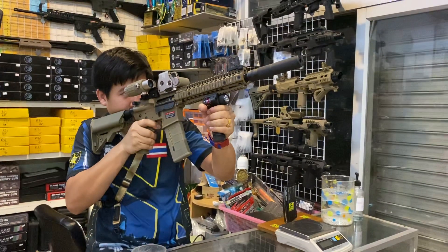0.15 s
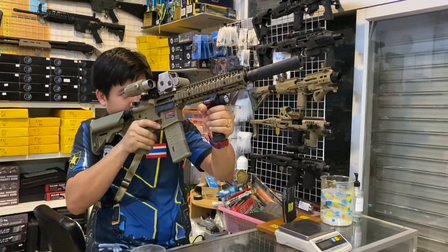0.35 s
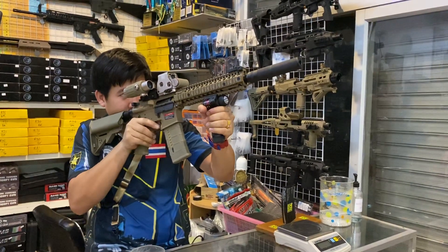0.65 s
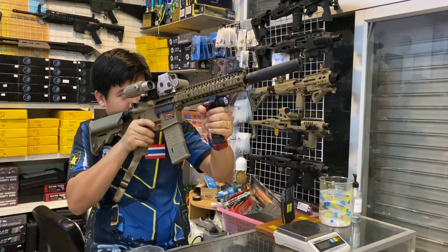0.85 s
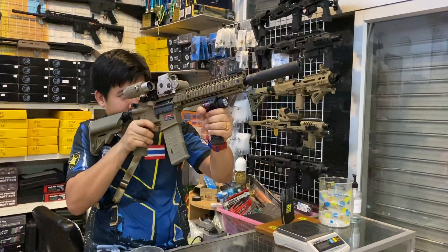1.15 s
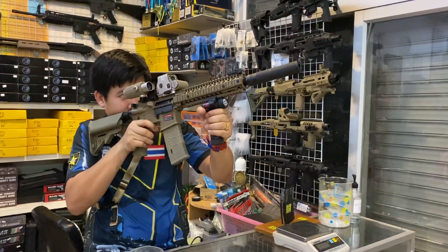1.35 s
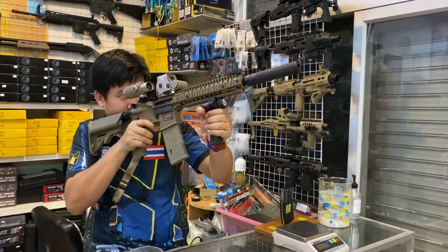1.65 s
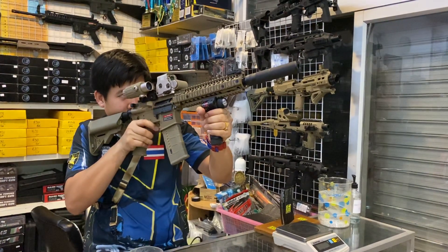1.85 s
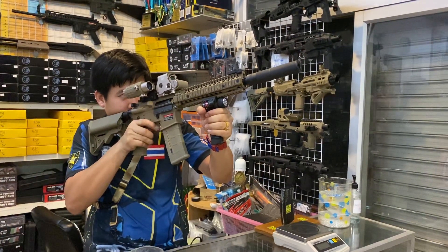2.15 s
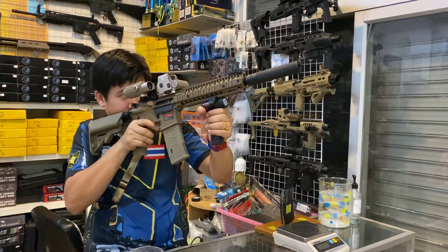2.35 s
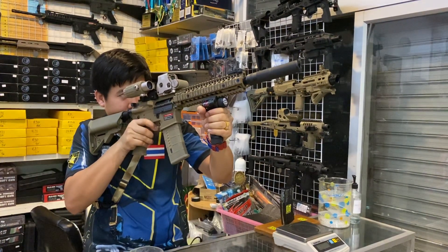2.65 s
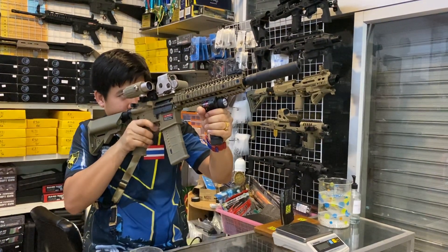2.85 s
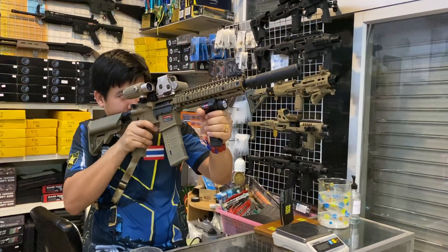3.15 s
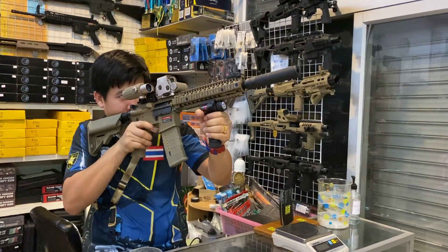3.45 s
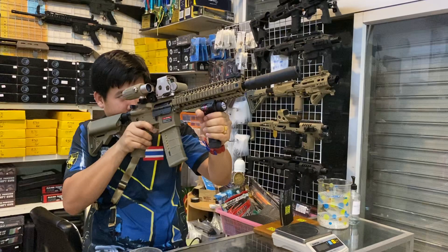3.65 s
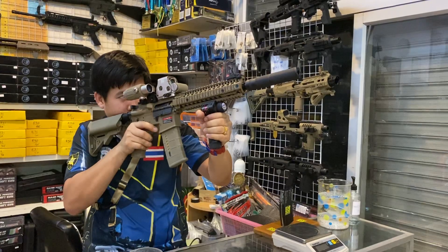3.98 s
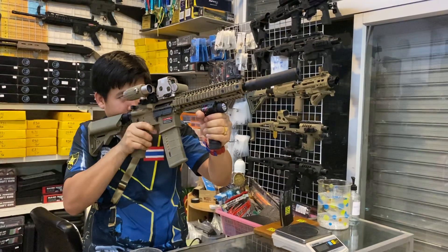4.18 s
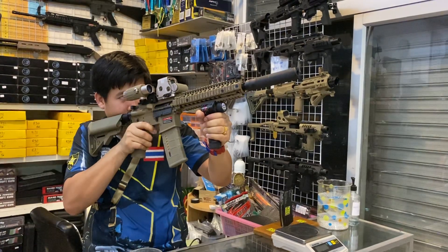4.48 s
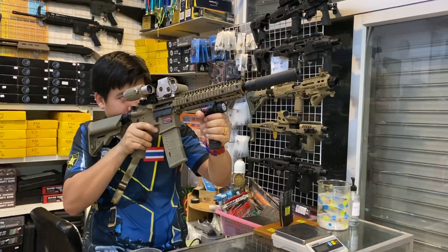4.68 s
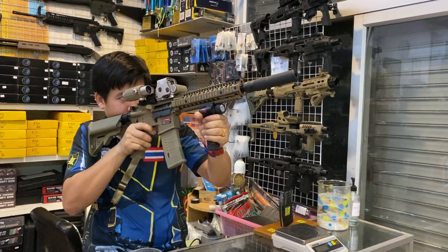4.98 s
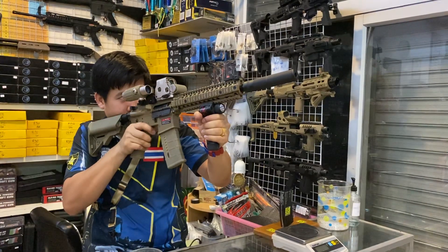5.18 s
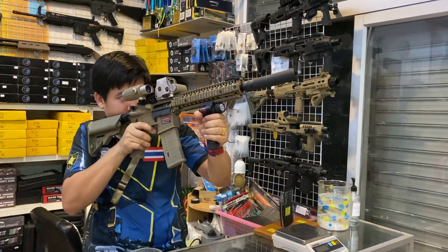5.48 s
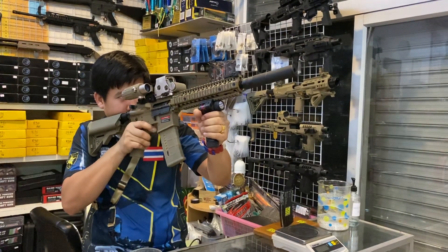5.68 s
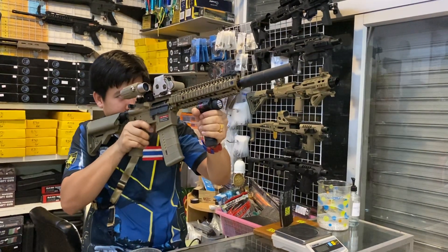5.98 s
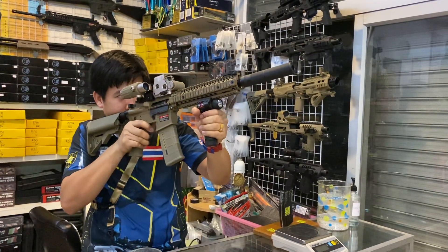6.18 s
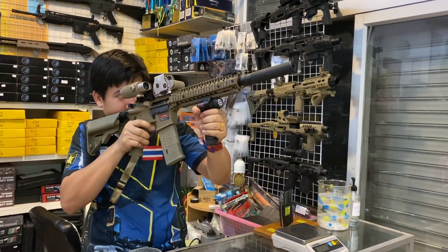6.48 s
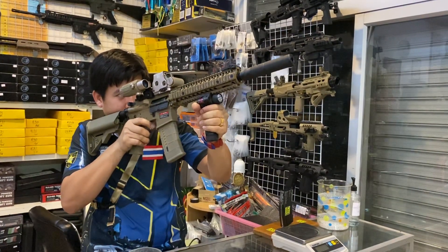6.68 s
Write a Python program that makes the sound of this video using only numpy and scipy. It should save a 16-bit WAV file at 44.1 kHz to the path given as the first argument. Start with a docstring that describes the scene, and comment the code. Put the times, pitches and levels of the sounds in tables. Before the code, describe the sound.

An electric airsoft rifle is fired in a small, cluttered shop, heard close in stereo. From 0 to 0.3 s a full-auto burst is already running, about twenty sharp dry cracks per second over gritty gear whine, then the motor coasts down. Between 0.5 and 0.9 s come faint cloth rustle and tiny clicks. From 0.92 to 3.6 s fifteen single shots follow at roughly five per second, each a brief motor wind-up, hard piston snap, hollow low air puff and, 20 ms later, a pellet's bright smack on a target. A small click falls at 3.95 s. Full-auto bursts run at 4.2-4.6, 5.0-5.5 and 5.95-6.45 s, the first shot of each strongest and the gears quieter in the later ones. Faint clicks near 6.65 s precede a final short wind-up at 6.8 s, cut before its shot. Short dense echoes, soft ventilation and low hum remain.

```python
"""Airsoft rifle in a small shop

The end of a full-auto burst, a run of quick single shots, three more bursts and a last wind-up.
Motor and gears wind the spring with a gritty whine, the piston slams home and air puffs from the muzzle;
some 20 ms later each pellet smacks a target in filtered noise and rings it. Struck parts are damped modes.
Soft clicks and rustle come from the hands. Dense echoes, faint ventilation and mains hum fill the shop."""
import sys
import numpy as np
from scipy import signal
from scipy.fft import rfft, irfft, next_fast_len
from scipy.io import wavfile
from scipy.ndimage import uniform_filter1d

SR = 44100
rng = np.random.default_rng(int(sys.argv[2]) if len(sys.argv) > 2 else 0)


def log_audio(samples):
    """Write samples as a 16-bit WAV file to the path given in sys.argv[1]."""
    # one column per channel
    frames = np.atleast_2d(samples).T
    # limit to full scale, then quantise
    limited = np.clip(frames, -1, 1)
    pcm = np.round(limited * 32767).astype(np.int16)
    wavfile.write(sys.argv[1], SR, pcm)


N = 301203
TIME = np.arange(N) / SR


def amp(db):
    """Turns decibels into a linear gain."""
    return 10 ** (np.asarray(db) / 20)


def unit(x):
    """Scales to rms 1."""
    return x / np.sqrt(np.mean(x ** 2) + 1e-20)


def read(points, hz):
    """Joins the points of a curve on a log-frequency axis."""
    f, value = np.transpose(points)
    return np.interp(np.log(hz + 1), np.log(f + 1), value)


def shape(x, gain):
    """Filters by a gain given as a function of Hz."""
    size = next_fast_len(x.shape[-1] + 4096)
    spectrum = rfft(x, size) * gain(np.fft.rfftfreq(size, 1 / SR))
    return irfft(spectrum, size)[..., :x.shape[-1]]


def noise(spectrum, channels=1):
    """Noise of rms 1 with the given spectrum."""
    white = rng.standard_normal((channels, N))
    return unit(shape(white, lambda hz: amp(read(spectrum, hz))))


def wander(smooth_samples):
    """Slow random curve of rms 1."""
    return unit(uniform_filter1d(rng.standard_normal(N), size=smooth_samples))


def blows(times, sizes):
    """One impulse for each time that falls inside the scene."""
    at = np.round(np.asarray(times) * SR).astype(int)
    return np.bincount(np.maximum(at, 0), sizes * (at >= 0), 2 * N)[:N]


def through(x, response):
    """Convolves and keeps the length of the scene."""
    return signal.fftconvolve(np.atleast_2d(x), np.atleast_2d(response), axes=1)[:, :N]


def ring(modes):
    """Damped modes answering one blow."""
    t = TIME[:SR // 3]
    return sum(amp(db - 60 * t / t60) * np.cos(2 * np.pi * hz * t) for hz, db, t60 in modes)


def spread(mid, side, apart):
    """Makes left and right from a shared part and a part of opposite sign."""
    return np.array([mid + apart * side, mid - apart * side])


def burst(hits, spectrum, decay_s, apart=0.92):
    """Each hit frees a puff of noise that dies quickly and differs between the channels."""
    mid, side = noise(spectrum, channels=2)
    envelope = through(hits, np.exp(-TIME[:SR // 8] / decay_s))
    return envelope * spread(mid, side, apart)


# spectrum of the ventilation: (frequency [Hz], relative level [dB])
VENTILATION = [(15, -30), (25, -15), (45, -9), (66, -10), (93, -12.5), (191, -13.5), (354, -28.5),
               (2240, -38), (5880, -38), (8100, -58), (8780, -45), (15000, -69)]


def background():
    """Faint ventilation as shaped noise, partly shared by the channels, and a steady mains hum."""
    air = noise(VENTILATION, channels=3)
    hum = np.sin(2 * np.pi * 50 * TIME)
    return amp(-64.5) * (air[2] + .5 * air[:2]) + amp(-67.5) * hum


SETTLE = .13  # share of the motor's slowness that is left after each cycle
FIRST_SLAM_DB, FIRST_PUSH_DB = 2.5, 3.0  # the first shot of a burst is stronger by this much
PELLET_FADE_DB = -.5  # per shot, as the aim wanders in a burst
SLAM_SCATTER_DB, PELLET_SCATTER_DB = 0.67, 1.5  # chance from shot to shot in a burst


def full_auto(first, last, cycle_s, lag_s, slam_db, push_db, first_pellet_db, pellet_db):
    """Shots of one burst: the cycle settles to a steady rate, and the last shot has its own time."""
    k = np.arange(round((last - first) / cycle_s) + 1)
    steady = first + k * cycle_s + lag_s * (1 - SETTLE ** k)
    s = np.append(steady[:-1], last)
    chance = rng.standard_normal((len(k), 2))
    slam = slam_db + FIRST_SLAM_DB * (k == 0) + SLAM_SCATTER_DB * chance[:, 0]
    push = push_db + FIRST_PUSH_DB * (k == 0)
    later_pellets = pellet_db + PELLET_FADE_DB * k + PELLET_SCATTER_DB * chance[:, 1]
    pellet = np.where(k == 0, first_pellet_db, later_pellets)
    return np.transpose([s, slam, push, pellet])


WIND_UP_S = .057  # from the trigger to a single shot
SINGLE_PUSH_DB = 4  # muzzle push of a single shot
# single shots, one trigger pull each; the last shot falls after the end, so only its wind-up is heard:
# (time [s], piston slam [dB], pellet impact [dB], gearbox [dB]), all levels relative
SINGLE_SHOTS = [(.9195, -13.5, -29.5, 2.5), (1.1441, -11.5, -26, -2), (1.362, -16.5, -30, 0),
                (1.5539, -13.5, -26.5, 0), (1.745, -16, -23.5, -0.5), (1.929, -13.5, -28, -.5),
                (2.1176, -14.5, -27, 0), (2.299, -17.5, -24.5, 1), (2.4889, -14.5, -27, 0.5),
                (2.6758, -13, -33, 0), (2.8611, -16.5, -24, 0), (3.0551, -15, -22.5, 1),
                (3.2353, -18, -18.5, 0.5), (3.4257, -17.5, -17.5, 0), (3.5974, -15, -20, -1.5),
                (6.842, -24, -25, -5.5)]
# full-auto bursts, the first already running at the start: (first shot [s], last shot [s], cycle [s],
# time lost gathering speed [s], wind-up [s], piston slam [dB], muzzle push [dB], first pellet [dB],
# later pellets [dB], gearbox [dB]), all levels relative
AUTO_BURSTS = [(-.0393, 0.291, 0.047, 0, 0.055, -17, 0.5, -25, -30.5, -1.5),
               (4.2311, 4.6238, 0.048, .0077, .059, -16.5, 1, -17.5, -23.5, -0.5),
               (5.032, 5.536, .04869, .0107, .046, -18.5, -1.1, -16, -23.5, -4),
               (5.9538, 6.453, .04912, .0064, 0.066, -18.5, -1.5, -25.5, -21.5, -6.5)]


def firing():
    """All shots (s, slam dB, push dB, pellet dB) and trigger pulls (s, last shot s, gearbox dB), in order."""
    shots = [(s, slam, SINGLE_PUSH_DB, pellet) for s, slam, pellet, _ in SINGLE_SHOTS]
    pulls = [(s - WIND_UP_S, s, gears) for s, _, _, gears in SINGLE_SHOTS]
    for first, last, cycle_s, lag_s, wind_up_s, *levels, gears in AUTO_BURSTS:
        shots += map(tuple, full_auto(first, last, cycle_s, lag_s, *levels))
        pulls.append((first - wind_up_s, last, gears))
    return np.array(sorted(shots)), np.array(sorted(pulls))


SAG, TENSION_S = .17, .016  # share of speed lost as the spring tightens, and how long before the shot
# shots on which the motor labours hardest against the spring: (time [s], further share of speed lost [0-1])
HARD_PULLS = [(.9195, .35), (5.9536, .34)]


def motor(shots, pulls, spin_up_s=0.034, overrun_s=0.0052, coast_s=0.058, start_slow=.48,
          sing_s=0.031, sing_width_s=0.018):
    """Level, speed and load: the motor spins up, labours against the spring and fades after the last shot."""
    shot_s = shots[:, 0]
    coming = np.append(shot_s, 2 * TIME[-1])[np.searchsorted(shot_s, TIME)]
    tension = np.exp((TIME - coming) / TENSION_S)  # the spring is tightest just before each shot
    sag = SAG + sum(lost * (abs(coming - s) < spin_up_s) for s, lost in HARD_PULLS)
    pull = np.maximum(np.searchsorted(pulls[:, 0], TIME) - 1, 0)
    start, last, db = pulls[pull].T
    age = np.maximum(TIME - start, 0)
    slow = np.exp(-age / spin_up_s)
    coast = np.exp(-np.maximum(TIME - last - overrun_s, 0) / coast_s)
    level = amp(db) * (1 - 0.95 * slow) * coast
    speed = (1 - start_slow * slow) * (1 - sag * tension)
    straining = np.exp(-((age - sing_s) / sing_width_s) ** 2)  # the teeth sing loudest gathering speed
    return level, speed, straining


# spectrum of the gears and the trigger: (frequency [Hz], relative level [dB])
GEAR_SPECTRUM = [(100, -29.5), (300, -16.5), (650, -6.5), (1200, -2), (2500, 1.5), (5000, -1.5), (8500, 3),
                 (13000, -3.5), (16000, -22.5)]
# whine of the meshing teeth, one entry for each multiple of the mesh rate: (relative level [dB])
WHINE_HARMONICS = [-39, -39, -38, -43.5, -41]
# the housing jolted as the motor starts: (frequency [Hz], relative level [dB], t60 [s])
START_JOLT = [(764, -40, 0.082), (1790, -38.5, 0.11), (2950, -51, .05)]
# resonances of the gearbox housing: (frequency [Hz], width [Hz], level over the direct sound [dB])
HOUSING_MODES = [(764, 390, 7), (1840, 210, 6), (2460, 160, 0), (2954, 91, 1), (3630, 82, -9),
                 (4940, 310, 3)]


def gearbox(shots, pulls, mesh_hz=1160):
    """Trigger click, motor kick, and teeth that whine, rasp and clatter through the housing's resonances."""
    level, speed, straining = motor(shots, pulls)
    pull_s, _, pull_db = pulls.T
    trigger = amp(-43.0) * burst(blows(pull_s, 0.89), GEAR_SPECTRUM, decay_s=0.0014)
    kick = through(blows(pull_s + 0.0021, amp(pull_db)), ring(START_JOLT))

    wavering_hz = mesh_hz * speed * (1 + .028 * wander(120))
    mesh = 2 * np.pi * np.cumsum(wavering_hz) / SR
    whine = sum(amp(db) * np.sin(k * mesh) for k, db in enumerate(WHINE_HARMONICS, 1))

    grit = amp(2.3 * wander(40))
    rasp_envelope = unit(grit * (1 + .5 * np.cos(mesh)))  # the rasp pulses with each tooth
    mid, side = amp(-29.5) * noise(GEAR_SPECTRUM, channels=2) * rasp_envelope
    rasp = spread(mid, side, .5)

    ticks = rng.standard_normal(N) * (rng.random(N) < 400 / SR)  # about 400 a second
    clatter = amp(-29) * burst(ticks, GEAR_SPECTRUM, decay_s=.0008)

    drive = (rasp + clatter + whine * (.08 + straining)) * level + trigger

    def housing(hz):
        return 1 + sum(amp(db) / (1 + 2j * (hz - f) / width) for f, width, db in HOUSING_MODES)
    return kick + shape(drive, housing)


# soft low bumps during the bursts, each starting 15 ms ahead of its time: (time [s], relative level [dB])
BASS_BUMPS = [(0.021, -28), (.115, -29), (4.399, -29.5), (5.254, -28), (6.04, -33)]


def bumps(bump_hz=55, decay_s=0.017):
    """A few heavily damped bass cycles that swell in softly."""
    s, db = np.transpose(BASS_BUMPS)
    t = TIME[:SR // 4]
    envelope = 2 * (1 - np.exp(-t / 0.0088)) * np.exp(-t / decay_s)
    return through(blows(s - .015, amp(db)), envelope * np.sin(2 * np.pi * bump_hz * t))


REBOUND_DB = -3.5  # rattle of the rebounding piston
AUTO_REBOUND_DB = 1.5  # how much harder it is with the gears still driving
# spectrum of the piston's crack: (frequency [Hz], relative level [dB])
CRACK_SPECTRUM = [(200, -18), (800, 3), (2000, -6), (4500, -1), (7000, -4.5), (10000, -1.5), (13000, -1.5),
                  (16000, -15)]
# the receiver struck by the piston: (frequency [Hz], level at an average slam [dB], t60 [s])
RECEIVER_MODES = [(779, -14.5, 0.0077), (1264, -15.5, 0.019), (1804, -29.5, 0.019), (3130, -28, 0.0025),
                  (3814, -30.5, 0.03), (4760, -20, 0.0067)]


def piston(shots):
    """The piston hits the cylinder head with a sharp tick, rings the receiver and rattles as it rebounds."""
    s, db, _, _ = shots.T
    running = np.diff(s, prepend=-1) < .1  # a shot came just before
    slams = blows(s, amp(db))
    tick = amp(2.0) * shape(slams, lambda hz: amp(read(CRACK_SPECTRUM, hz)) / (1 + 1j * hz / 14000))
    crack = amp(7.0) * burst(blows(s - .0003, amp(db)), CRACK_SPECTRUM, decay_s=0.00063)
    rebound_db = db + REBOUND_DB + AUTO_REBOUND_DB * running
    rebound = burst(blows(s + .0047, amp(rebound_db)), CRACK_SPECTRUM, decay_s=0.0063)
    # the ring varies half as much, in dB, as the slam
    body = through(blows(s, amp((db - db.mean()) / 2)), ring(RECEIVER_MODES))
    return tick + crack + rebound + body


HOOT_FOLLOWS, HOOT_DB = 0.83, 0.5  # share of the push (in dB) by which the hoot grows, and its added level
# air in the barrel and suppressor: (frequency [Hz], relative level [dB], t60 [s])
BARREL_MODES = [(343.7, -25, 0.041), (446, -33.5, 0.093), (546, -31.5, 0.067), (836, -25.5, .03),
                (1046, -18.5, 0.021), (1172, -18, 0.013), (1322, -26.5, 0.025)]


def muzzle(shots, delay_s=0.00494, thump_hz=155, thump_db=-24.0):
    """Air leaves the muzzle: the barrel hoots over one low push of pressure."""
    s, _, db, _ = shots.T
    t = TIME[:SR // 3]
    hoot_blows = blows(s + delay_s, amp(HOOT_DB + HOOT_FOLLOWS * db))
    hoot = through(hoot_blows, ring(BARREL_MODES) * (1 - np.exp(-t / 0.00033)))
    swing = np.cos(2 * np.pi * thump_hz * (t - .0082)) * np.exp(-((t - .0085) / .0048) ** 2)
    push = through(blows(s, amp(db)), amp(thump_db) * swing)
    return hoot + push


# low standing waves of the shop: (frequency [Hz], relative level [dB], t60 [s])
STANDING_WAVES = [(60.5, -46, 0.38), (80, -50.5, 0.18), (125.8, -34.5, 0.18), (140.1, -34, 0.1),
                  (204, -37, 0.13)]


def shop_boom(shots):
    """The muzzle's low push wakes the standing waves of the shop, which build up and die away."""
    s, _, db, _ = shots.T
    build = 1 - np.exp(-TIME[:SR // 3] / 0.007)
    return through(blows(s + .0082, amp(db)), ring(STANDING_WAVES) * build)


# spectrum of the pellet's smack: (frequency [Hz], relative level [dB])
SMACK_SPECTRUM = [(200, -27.5), (700, -10), (1400, -7.5), (2200, -4), (3100, -2), (4000, -2.5), (5200, 1),
                  (7000, -2), (10000, -1.5), (13000, -7), (16000, -24)]
# the target rung by a pellet: (frequency [Hz], relative level [dB], t60 [s])
TARGET_MODES = [(440, -19, 0.045), (1020, -16, 0.075), (3100, -14.5, .025)]


def pellets(shots, flight_s=0.02, scatter_s=0.00046, echo_s=.008):
    """Each pellet smacks the target and rings it briefly; one early echo follows 8 ms later."""
    s, _, _, db = shots.T
    lands = s + flight_s + scatter_s * rng.standard_normal(len(s))
    hits = blows(lands, amp(db + 6)) + blows(lands + echo_s, amp(db - 1.5))
    smack = burst(hits, SMACK_SPECTRUM, decay_s=0.0041, apart=0.99)
    return smack + through(hits, ring(TARGET_MODES))


# decay of the echoes: (frequency [Hz], t60 [s])
ECHO_DECAY = [(80, 0.5), (210, 0.31), (560, 0.39), (1470, 0.38), (3880, 0.36), (10200, 0.29), (15000, 0.36)]
# spectrum of the echoes: (frequency [Hz], relative level [dB])
ECHO_SPECTRUM = [(50, -17), (130, -11.5), (300, -2.5), (700, -8), (1300, -6.5), (2500, -5), (5000, -7.5),
                 (9000, -1.5), (13000, -9), (16000, -25)]


def shop(x, gap_s=0.002, build_s=0.00057):
    """Dense echoes off crowded shelves, each band dying at its own speed."""
    t = TIME[:SR * 2 // 3]
    taps = rng.standard_normal((3, len(t))) * (rng.random((3, len(t))) < 5000 / SR)
    build = 1 - np.exp(-np.maximum(t - gap_s, 0) / build_s)
    taps = (taps[:2] + 0.79 * taps[2]) * build  # the third set is shared by both channels
    hz, age, z = signal.stft(taps, SR, nperseg=256)
    decay = amp(-60 * age / read(ECHO_DECAY, hz)[:, None])
    tail = signal.istft(z * decay, SR, nperseg=256)[1]
    tail = tail / np.linalg.norm(tail, axis=1, keepdims=True)
    return through(x, shape(tail, lambda hz: amp(read(ECHO_SPECTRUM, hz))))


# sleeve and sling shifting: (time [s], level before the folds [dB])
RUSTLE_LEVEL = [(.48, -79), (0.559, -54), (.62, -65), (0.691, -61), (.74, -56.5), (.8, -64), (0.862, -63.5)]
# spectrum of the cloth: (frequency [Hz], relative level [dB])
RUSTLE_SPECTRUM = [(150, -3), (500, -3.5), (1000, -1.5), (2000, -4), (3700, -14), (6000, -19.5),
                   (14000, -30)]


def rustle():
    """Faint rub of sleeve and sling: soft noise whose level wavers as the cloth folds."""
    s, db = np.transpose(RUSTLE_LEVEL)
    folds = amp(3.5 * wander(600))
    level = np.interp(TIME, s, amp(db), 0, 0)
    return noise(RUSTLE_SPECTRUM, channels=2) * folds * level


# small clicks of the fire selector and the grip: (time [s], relative level [dB], centre [Hz])
HAND_CLICKS = [(.5896, -51.5, 8400), (.6524, -49, 9200), (0.7294, -52, 2800), (3.945, -36.5, 8940),
               (6.6383, -51, 4010), (6.75, -65, 7030)]


def hand_clicks():
    """Little clicks from the selector and the grip: short puffs of noise peaking at their own pitch."""
    return sum(burst(blows([s], amp(db)), [(hz / 8, -20), (hz, 0), (4 * hz, -28)], decay_s=0.0057)
               for s, db, hz in HAND_CLICKS)


def scene():
    """The rifle, its pellets and the hands on it, with the echoes and the air of the shop."""
    shots, pulls = firing()
    slam, puff, boom, smack = piston(shots), muzzle(shots), shop_boom(shots), pellets(shots)
    gears, hands = gearbox(shots, pulls), hand_clicks() + rustle()
    sent = amp(4.0) * slam + amp(-0.5) * puff + amp(1.0) * smack + amp(-14.0) * gears + amp(-1.5) * hands
    sway = 2 * np.pi * .9 * TIME  # the rifle moves, so the pattern of echoes drifts
    echoes = shop(sent * np.cos(sway)) + shop(sent * np.sin(sway))
    return slam + puff + boom + smack + gears + hands + bumps() + echoes + background()


EDGE_HZ = 16200  # upper band limit
# balance of the channels: (frequency [Hz], left over right [dB])
LEFT_OVER_RIGHT = [(150, -0.5), (800, -1.5), (1500, 0.5), (3000, 2), (5500, 4.5), (7500, -0.5)]
# in the treble the two channels twist apart in phase: (frequency [Hz], lead of the right channel [turns])
PHASE_TWIST = [(6700, 0), (7700, .27), (9000, .68), (9650, .97), (10500, 1.03), (11700, 1.45),
               (12600, 1.56), (13500, 1.96), (14600, 2.06), (15500, 2.48)]


def record(dry):
    """Bass roll-off; the channels draw together and twist in phase in the treble; then the band limit."""
    dry = signal.sosfilt(signal.butter(2, 38, "highpass", fs=SR, output="sos"), dry)
    mid = dry.mean(0)
    width = [(200, -6.0), (1000, 1.5), (6500, -2), (9000, -9.5)]  # (frequency [Hz], side gain [dB])
    side = shape((dry[0] - dry[1]) / 2, lambda hz: amp(read(width, hz)))

    def lean(hz, sign):  # each channel takes half of the balance and half of the twist
        return amp(sign * read(LEFT_OVER_RIGHT, hz) / 2) * np.exp(-1j * sign * np.pi * read(PHASE_TWIST, hz))
    left = shape(mid + side, lambda hz: lean(hz, 1))
    right = shape(mid - side, lambda hz: lean(hz, -1))
    low_pass = signal.firwin(511, EDGE_HZ, window=("kaiser", 9), fs=SR)
    return signal.oaconvolve(np.clip([left, right], -1, 1), low_pass[None], "same")


dry = scene()
out = record(dry)
log_audio(out)
```